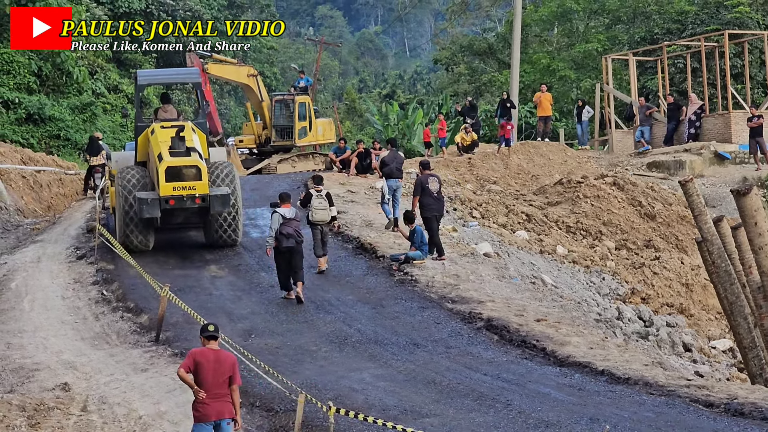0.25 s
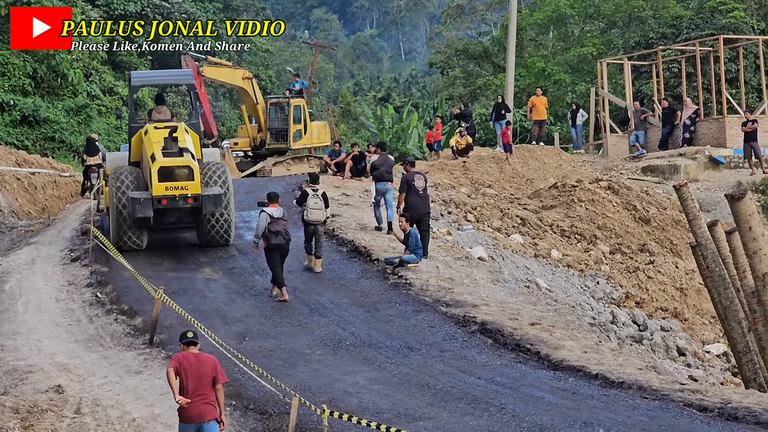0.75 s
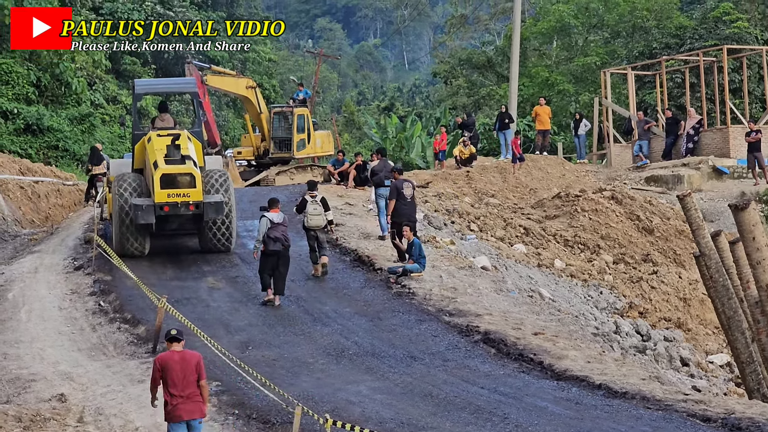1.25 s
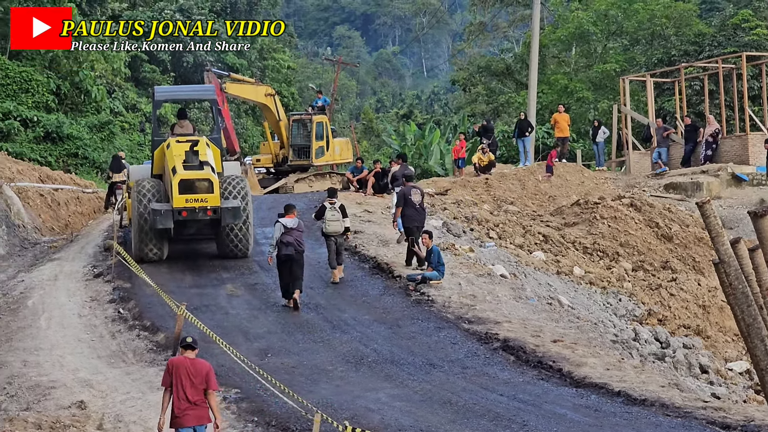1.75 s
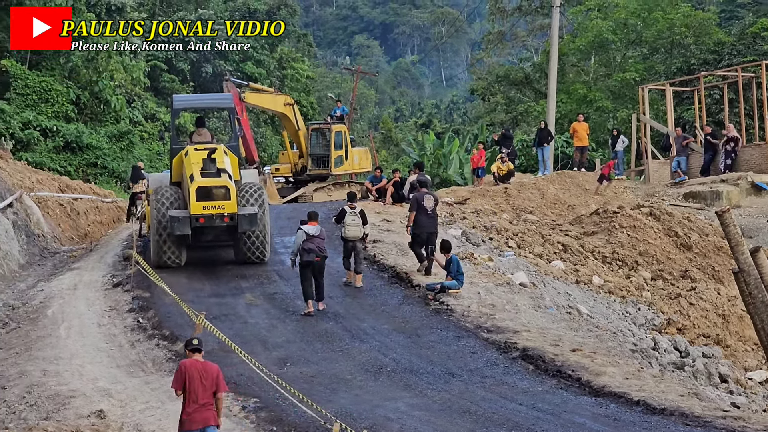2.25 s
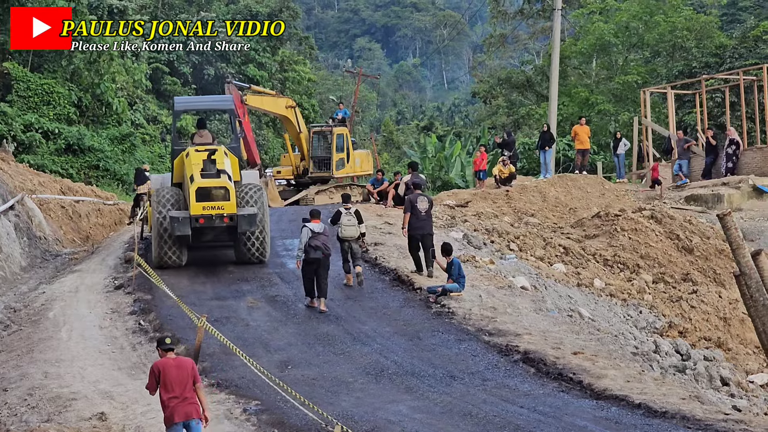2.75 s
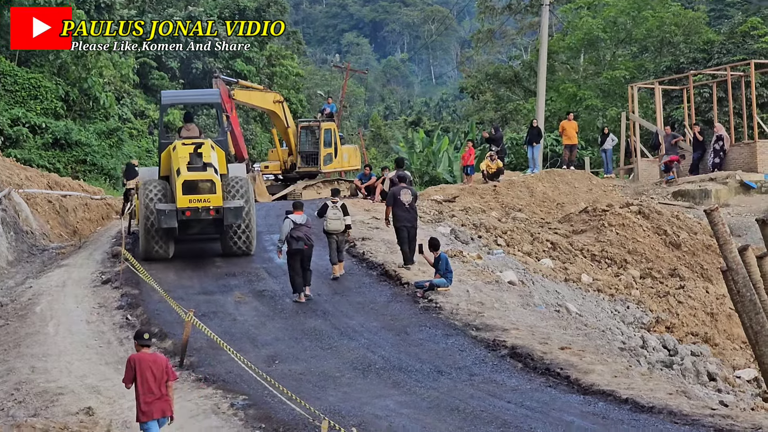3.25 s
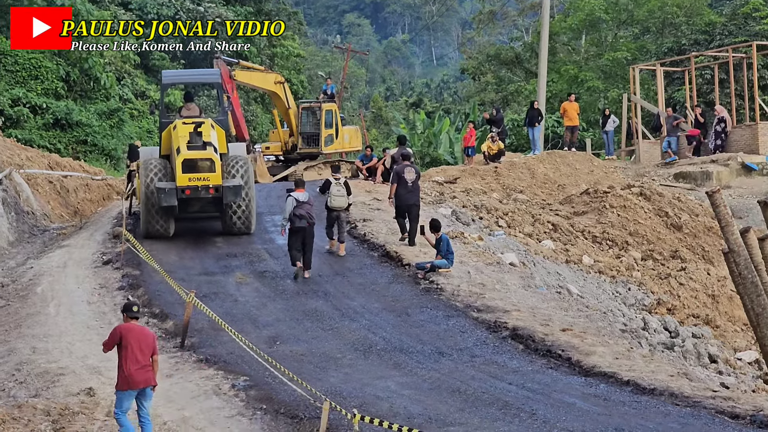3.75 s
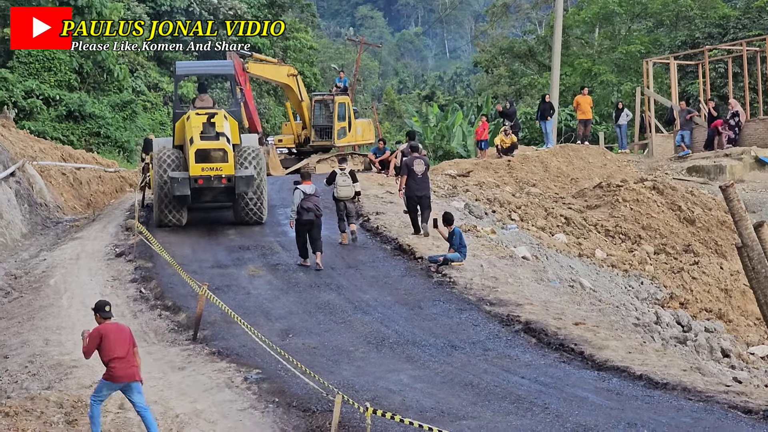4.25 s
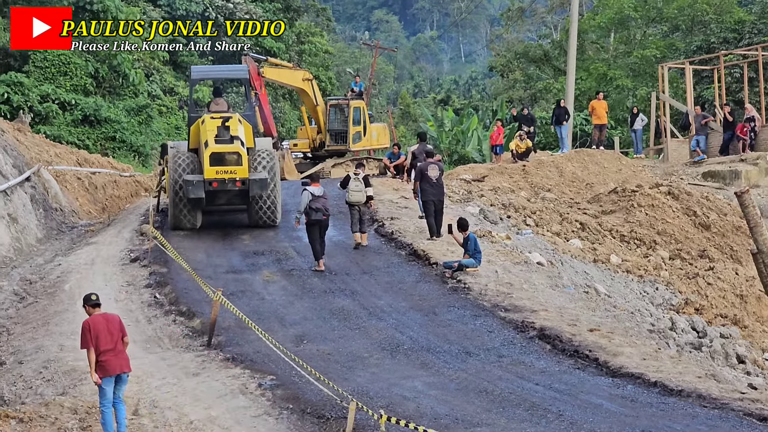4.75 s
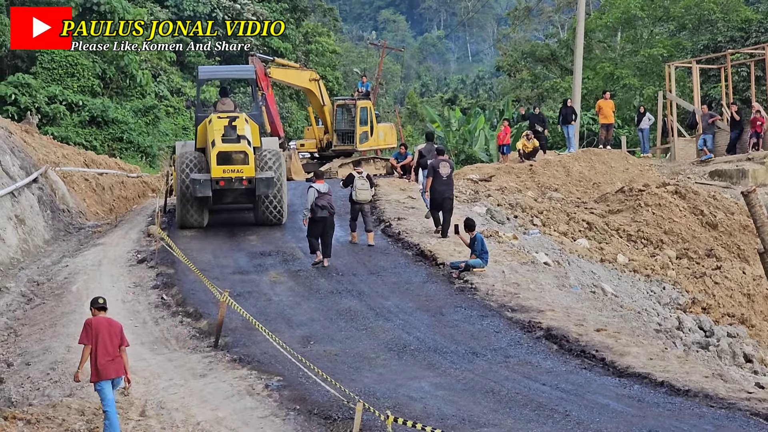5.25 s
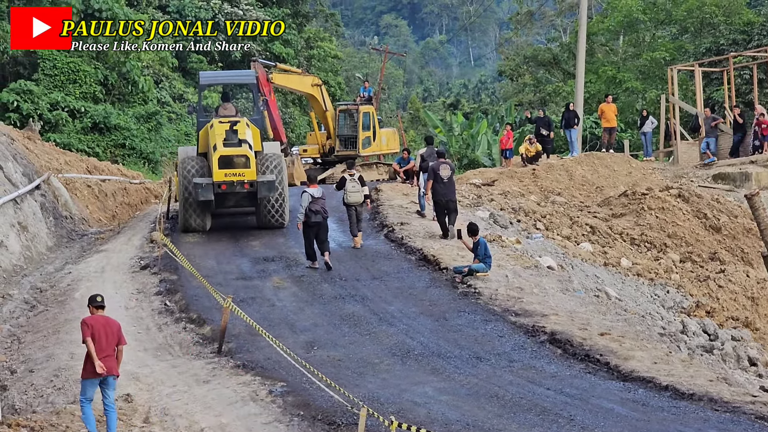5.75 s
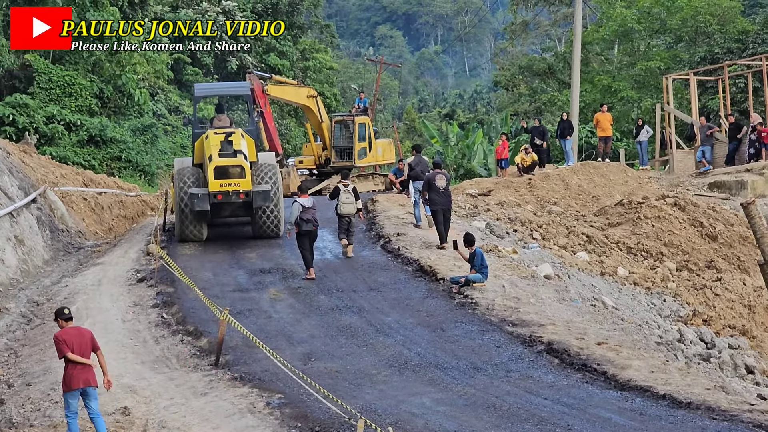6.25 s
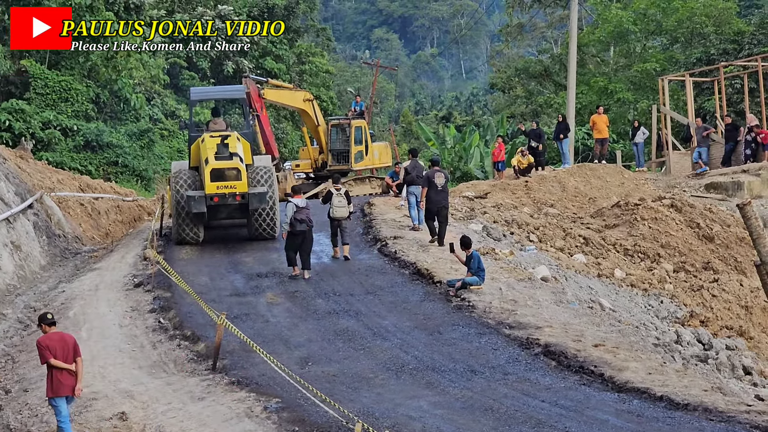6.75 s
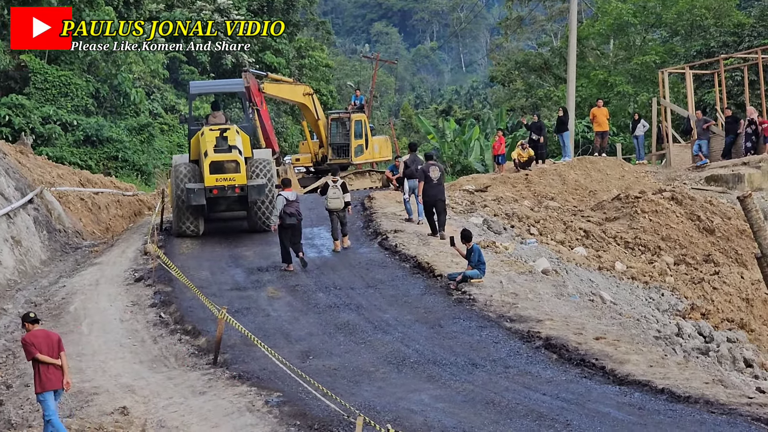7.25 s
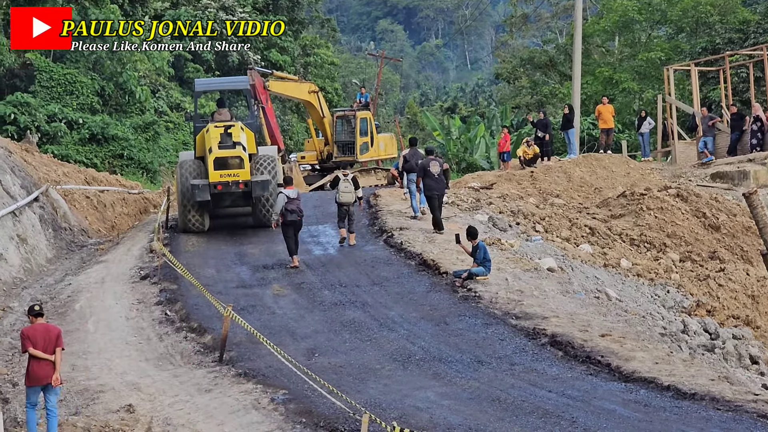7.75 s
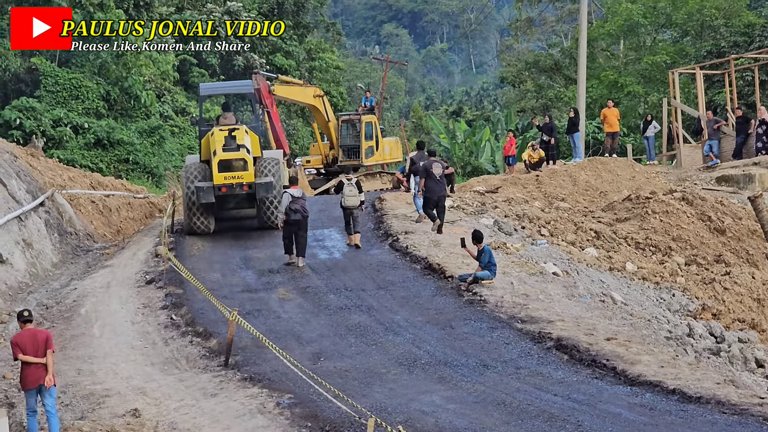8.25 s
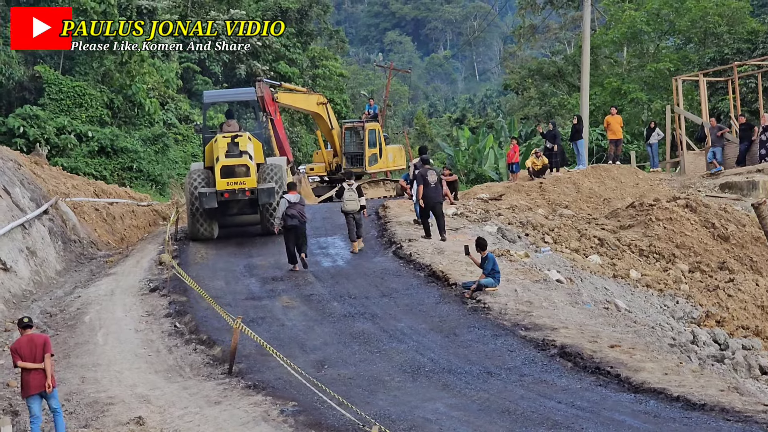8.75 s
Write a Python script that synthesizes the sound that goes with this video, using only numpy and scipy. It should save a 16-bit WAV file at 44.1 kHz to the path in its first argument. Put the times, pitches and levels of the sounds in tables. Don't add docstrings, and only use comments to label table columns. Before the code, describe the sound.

Strong low diesel hum from a working road roller, layered with whine and hissy mechanical clatter, with a few metallic knocks and faint chirps.

```python
import sys
import numpy as np
from scipy import signal
from scipy.fft import rfft, irfft
from scipy.io import wavfile
from scipy.ndimage import uniform_filter1d

SR = 44100
rng = np.random.default_rng(int(sys.argv[2]) if len(sys.argv) > 2 else 0)


def amp(db):
    return 10 ** (np.asarray(db, float) / 20)


def write(x):
    x = np.atleast_2d(x).T
    wavfile.write(sys.argv[1], SR, np.round(np.clip(x, -1, 1) * 32767).astype(np.int16))


N = 396900


def in_time(rows):
    s, *columns = np.transpose(rows)
    return [np.interp(np.arange(N) / SR, s, c) for c in columns]


def at_hz(rows, hz):
    f, *columns = np.transpose(rows)
    return [np.interp(np.log(hz), np.log(f), c) for c in columns]


def drift(rate_hz):
    pole = np.exp(-80 * np.pi * rate_hz / SR)
    white = rng.standard_normal(N // 40 + 2002)
    slow = signal.lfilter([1], [1, -2 * pole, pole * pole], white)[2000:]
    return np.interp(np.arange(N) / 40, np.arange(len(slow)), slow / slow.std())


def bump(at_s, width_s):
    return np.exp(-((np.arange(N, dtype=np.float32) / SR - at_s) / width_s) ** 2)


def from_db(db):
    return np.exp(np.float32(np.log(10) / 20) * np.asarray(db, np.float32))


def pan(x, left_db):
    return x * from_db(np.array([[.5], [-.5]]) * left_db)


def add_at(out, s, x):
    out[:, round(s * SR):][:, :x.shape[1]] += x


# t/s, firing f/Hz, exhaust hum level/dB
GOVERNOR = [(0, 60.48, -8.5), (.3, 60.55, -8.5), (.75, 60.87, -7.9), (1.5, 61.62, -8.4), (1.8, 61.3, -8.2),
            (2.2, 61.06, -7.2), (2.75, 61.27, -6.9), (3.4, 60.96, -7.4), (4.15, 60.5, -8.1),
            (4.75, 61.06, -8.4), (5.1, 61.13, -8.1), (5.5, 61.02, -8.3), (5.95, 61.4, -7.8),
            (6.55, 61.0, -7.1), (7.45, 61.25, -7.0), (8.0, 61.1, -7.4), (8.5, 61.29, -7.2),
            (9, 61.13, -8.1)]


def engine_cycle():
    firing_hz, hum_db = in_time(GOVERNOR)
    start_rad = 1.32
    return start_rad + 2 * np.pi * np.cumsum(firing_hz / 4) / SR, hum_db


# t/s, turn/0-1
PORT_TURN = [
    (0, 0.1),
    (3.4, 0.15),
    (3.8, 0.5),
    (4.2, 0.92),
    (4.6, 0.9),
    (9, 0.97),
]


def turn_at(s):
    return np.interp(s, *np.transpose(PORT_TURN))


# f/Hz, left level/dB per Hz, right level/dB per Hz, left lead/rad, likeness/0-1
AWAY_POSE = [(25, -53.5, -55.5, -.2, 0.99), (112, -45.5, -47, -.05, 1.0), (167, -52.5, -54.3, -.05, 1),
             (404, -65, -63.5, 0.1, 0.86), (556, -61.5, -68.5, 0.7, 0.7), (803, -59.5, -57, -0.1, 0.95),
             (920, -64.5, -65.5, 2.02, 0.8), (1880, -72.5, -78.5, 2.2, 0.6), (2360, -76, -80.5, 5.3, 0.4),
             (3300, -80, -77.5, 7.5, 0.6), (4600, -82.5, -76, 10, 0.7), (7200, -94, -93.5, 12.5, 0.6),
             (8900, -103.2, -116.9, 12, 0), (10500, -96.5, -100.5, 17, 0.17)]
ROLLER_POSE = [(24.5, -58, -57, -.2, 0.95), (113, -46, -48, -.1, 0.99), (174, -55, -56.5, -0.1, 0.97),
               (400, -60.5, -61.5, 0.3, 0.9), (570, -56.5, -57.5, 0.2, 0.92), (790, -66.5, -68.5, 1, 0.98),
               (930, -62, -63, 0.36, 0.88), (1900, -70, -71, 1.0, 0.96), (2310, -73.5, -76, 0.7, 0.7),
               (3320, -77.5, -78, 1.6, 0.65), (4340, -84.5, -84, 2.7, 0.9), (6960, -95, -98.5, 4, 0.4),
               (9400, -103.4, -110.8, 10.5, 0.18), (10600, -100.8, -103.7, 20, 0.1)]


def tone(order, cycle, level_db, turn, start_rad):
    hz = order * cycle[-1] / (2 * np.pi * N / SR)
    l0, r0, lead0, _ = at_hz(AWAY_POSE, hz)
    l1, r1, lead1, _ = at_hz(ROLLER_POSE, hz)
    lead = (lead0 + turn * (lead1 - lead0)) * np.array([[.5], [-.5]])
    left_db = l0 - r0 + turn * (l1 - r1 - l0 + r0)
    phase = order * cycle % (2 * np.pi) + start_rad + lead
    return pan(np.sqrt(2) * from_db(level_db) * np.cos(phase.astype(np.float32)), left_db)


# t/s, width/s, exhaust octave lift/dB, fan tone lift/dB
ECHO_IN_STEP = [(.1, 0.42, 1.5, 7.5), (.5, .2, 8.5, -1), (1.1, 0.17, 6.5, 4), (1.5, 0.25, 9, 0),
                (2.55, 0.59, 5, 2.5), (4.1, 0.41, 5.5, 9), (4.5, 0.24, 5, -3), (5.3, 0.18, 2.5, 7),
                (5.7, 0.24, 5.5, -0.5), (6.952, 0.58, 7.5, 7), (8.3, .3, 3.5, -1.5)]


def echo_lifts():
    return sum(bump(s, width_s) * np.array([[octave], [fan]]) for s, width_s, octave, fan in ECHO_IN_STEP)


def exhaust(cycle, turn, hum_db, octave_lift_db):
    hum = np.cos(4 * cycle + [[-.1], [.1]])
    out = pan(np.sqrt(2) * amp(hum_db + .1 * drift(4)), 1.65) * hum
    out += tone(8, cycle, -30 + octave_lift_db + .9 * drift(5), turn, np.pi / 2)
    return out + tone(12, cycle, -34 - 2.5 * turn, turn, -np.pi / 2)


def fan(cycle, turn, lift_db):
    belt_slip = .99618
    t = np.arange(N) / SR
    hidden_db = 2.5 * np.maximum(t - 6.7, 0)
    upper_db = -35 + lift_db - .95 * t - hidden_db
    out = tone(12 * belt_slip, cycle, -36.5 - 2.5 * turn, turn, np.pi / 2 + .14)
    return out + tone(16 * belt_slip, cycle, upper_db + .5 + .4 * drift(4), turn, 0)


# t/s, second harmonic level/dB
PUMP_SECOND = [(0, -28), (.3, -29), (.8, -33.5), (1.5, -34.5), (2.2, -34.5), (2.5, -30), (2.8, -33.5),
               (3.6, -30), (4.0, -26), (4.3, -29.5), (4.8, -28.5), (5.25, -35), (5.5, -29), (5.77, -41.5),
               (6.4, -29.5), (7.0, -29.5), (7.3, -33.5), (9, -34.5)]


def pump(cycle, turn):
    second_db, = in_time(PUMP_SECOND)
    away_db = -42.5 - .4 * (second_db - second_db.max())
    null_db = -6 * bump(3.7, .3)
    third_db = away_db + turn * (-45.5 - away_db) + null_db
    out = tone(36, cycle, second_db + drift(5.9), turn, .68 * drift(1.6))
    return out + tone(54, cycle, third_db + 1.9 * drift(6), turn, .16 * drift(2.7))


# order/cycle, away level/dB, facing level/dB
WEAK_ORDERS = [(2, -45, -44.5), (2.91, -40.5, -34.5), (6, -48.5, -41), (7, -39.5, -42.5), (9, -41, -40),
               (10.27, -40.5, -37), (15, -44, -48.5), (16.75, -50.5, -48), (17.96, -50.5, -49.5),
               (20.11, -45, -48), (21, -51, -53.5), (22.72, -54, -54), (32, -63.5, -41), (34, -48, -41),
               (38.02, -48.5, -42.5), (40.4, -44, -52.5), (44, -48.5, -47)]
# harmonic, away level/dB, facing level/dB
PUMP_UPPER = [
    (5, -56, -57),
    (6, -55, -60),
    (7, -50.5, -49),
    (9, -66.5, -62),
]


def weak_orders(cycle, turn):
    out = np.zeros((2, N))
    upper = [(18 * k, away_db, facing_db) for k, away_db, facing_db in PUMP_UPPER]
    for order, away_db, facing_db in list(WEAK_ORDERS) + upper:
        level_db = away_db + turn * (facing_db - away_db) + 1.9 * drift(2.8)
        start_rad = rng.uniform(0, 2 * np.pi) + .45 * drift(1.9)
        out += tone(round(order), cycle, level_db, turn, start_rad)
    return out


CYLINDER_CLATTER = [
    -3.5,
    2,
    -5.5,
    -4,
]


def clatter(cycle, repeat=.41, gate_db=.5):
    turns = cycle / (2 * np.pi)
    pattern = rng.standard_normal(2890)
    looped = pattern[(turns % 1 * len(pattern)).astype(int)]
    strokes = 4 * turns
    stroke = strokes.astype(int)
    strength = amp(np.array(CYLINDER_CLATTER)[stroke % 4] + rng.normal(0, 1.7, 600)[stroke])
    to_next = -strokes % 1
    gate = 1 + (amp(gate_db) - 1) * strength * np.exp(to_next / .56)
    gate = uniform_filter1d(gate, size=90)
    fresh = rng.standard_normal(N) * gate / np.sqrt(np.mean(gate ** 2))
    return np.sqrt(repeat) * looped + np.sqrt(1 - repeat) * fresh, gate


# f/Hz, width/Hz, away lift/dB, facing lift/dB
BODY_PANELS = [(244, 20, 3, 1), (638, 47, 5, 3.5), (1009, 19, -9, 7.5), (1188, 36, 6.5, 3),
               (1387, 120, 5.5, 3), (1968, 130, 6.5, 5.5), (2515, 33, 7.5, -2.5), (2760, 160, 7.5, 1),
               (2993, 70, 6, 4.5), (3920, 50, 5.5, 2), (4500, 420, 2.5, 4.5), (5360, 130, 3, -2),
               (2070, 48, -2, 0), (82, 38, -2, 2), (220, 18, -1.5, -4.5), (154, 32, 5, 5),
               (304, 22, 3.5, 0), (11400, 4100, 1, -1), (14500, 2200, -6, -2.5)]


def at_ports(shared, own, pose, column):
    hz = np.maximum(np.fft.rfftfreq(N, 1 / SR), 1)
    left_db, right_db, lead, alike = at_hz(pose, hz)
    alike = np.clip(alike, 0, 1)
    lift_db = sum(row[column] / (1 + (2 * (hz - row[0]) / row[1]) ** 2) for row in BODY_PANELS)
    common = np.sqrt(alike) * shared * np.exp(.5j * lead * [[1], [-1]])
    mixed = common + np.sqrt(1 - alike) * own
    return mixed * amp(np.array([left_db, right_db]) + lift_db) * np.sqrt(SR / 2)


# centre f/Hz, trim/dB, loss/dB per s as the roller draws off, close-range lift/dB
NOISE_RANGES = [
    (130, -1.5, 0.0, 2.5),
    (700, 1.5, 0.38, 0.5),
    (3500, 1.5, 0.35, 2.5),
    (11000, 4, 0.0, -0.5),
]


def range_levels():
    t = np.arange(N) / SR
    _, trim_db, loss, close_db = np.transpose(NOISE_RANGES)[..., None]
    levels_db = trim_db - loss * t + close_db * np.exp(-t / .2)
    levels_db[0] -= 3 * bump(5.2, .98)
    levels_db[3] -= 4.5 * bump(3.65, .3)
    return levels_db


def engine_noise(cycle, turn, own_db=1.34, shared_db=.5):
    shared, gate = clatter(cycle)
    own = rfft(rng.standard_normal((2, N)) * gate ** .5 / np.mean(gate) ** .5)
    shared = rfft(shared)
    poses = np.array([at_ports(shared, own, AWAY_POSE, column=2),
                      at_ports(shared, own, ROLLER_POSE, column=3)], np.complex64)
    hz, turn = np.fft.rfftfreq(N, 1 / SR), np.clip(turn, 0, 1)
    late = np.interp(np.arange(N) - .3 * SR, np.arange(N), turn)
    swells_db, together = range_levels(), drift(8)
    centres = np.log(np.transpose(NOISE_RANGES)[0])
    below, out = 1 / (1 + (hz / 42) ** 6), 0
    for edge_hz in 90 * 2 ** np.arange(0, 7.6, .5):
        under = 1 / (1 + (hz / edge_hz) ** 12)
        away, facing = irfft(poses * (under - below).astype(np.float32), N)
        below = under
        share = [np.interp(np.log(edge_hz * .84), centres, row) for row in np.eye(4)]
        flicker_db = shared_db * together + own_db * (drift(3) + .8 * drift(30))
        gain = from_db(share @ swells_db + flicker_db)
        turned = (late if edge_hz < 1100 else turn).astype(np.float32)
        out = out + gain * ((1 - turned) ** .7 * away + turned ** .7 * facing)
    return out


# t/s, ring level/dB, rattle level/dB, rattle centre f/Hz, left minus right/dB
METAL_KNOCKS = [
    (6.211, -22.5, -31, 1300, 1),
    (6.220, -17.5, -14, 450, 1),
    (6.224, -44, -32, 1900, 1),
    (7.99, -35, -36, 490, 5),
    (8.15, -46, -40, 2300, 4),
    (8.25, -46, -39, 2300, 4),
    (8.345, -38, -36, 1800, 4),
    (8.36, -44, -36, 2400, 6),
]
# f/Hz, level/dB, t60/s
SHEET_MODES = [(345, 0, .16), (440, -1, .12), (500, -2, .07), (620, -2, .07), (1019, 5, .19),
               (1211, -5, .12), (1365, 0, .22), (1561, -3, .15), (1764, -2, .18), (1990, -1, .08)]


def knocks():
    out, t = np.zeros((2, N)), np.arange(SR // 4) / SR
    lucks = rng.normal(0, .75, (len(METAL_KNOCKS), len(SHEET_MODES)))
    for (s, ring_db, rattle_db, rattle_hz, left_db), luck in zip(METAL_KNOCKS, lucks):
        ring = 0
        for (hz, mode_db, t60_s), d in zip(SHEET_MODES, luck):
            far_db = 10 * abs(np.log2(hz / rattle_hz))
            ring = ring + amp(mode_db + d - far_db - 60 * t / t60_s) * np.sin(2 * np.pi * hz * t + d)
        edges_hz = [rattle_hz / 1.45, rattle_hz * 1.45]
        band = signal.butter(4, edges_hz, "band", fs=SR, output="sos")
        rattle = amp(rattle_db + 8 - 60 * t / .25) * signal.sosfilt(band, rng.standard_normal(len(t)))
        attack = np.minimum(t / .0036, 1)
        add_at(out, s, pan((amp(ring_db) * ring + rattle) * attack, left_db))
    return out


# t/s, peak level/dB, left minus right/dB
DRY_TICKS = [
    (3.6692, -41.5, 4),
    (4.9205, -45.5, -5),
    (5.4648, -42, 2.5),
]


def ticks():
    out, t = np.zeros((2, N)), np.arange(SR // 50) / SR
    for s, peak_db, left_db in DRY_TICKS:
        burst = rng.standard_normal(len(t))
        add_at(out, s, pan(amp(peak_db - 2 - 60 * t / .013) * burst, left_db))
    return signal.sosfilt(signal.butter(2, 1500, "high", fs=SR, output="sos"), out)


# t/s, length/s, start f/Hz, glide/Hz, level/dB
FAR_CHIRPS = [
    (2.31, .03, 4000, -50, -53),
    (2.37, .04, 4500, -50, -54),
    (4.915, .03, 3250, 80, -54),
    (4.945, .04, 3560, -60, -54),
    (5.02, .05, 3150, -250, -54),
    (5.655, .1, 13700, -400, -70),
    (6.92, .18, 4430, -90, -60),
    (8.135, .07, 2200, 100, -51),
]


def chirps():
    out, flutter = np.zeros((2, N)), amp(3.5 * drift(30) - 1.5)
    for s, length_s, start_hz, glide_hz, level_db in FAR_CHIRPS:
        left_db = -4 * (1 - turn_at(s))
        t = np.arange(round(length_s * SR)) / SR
        glide = np.sin(2 * np.pi * (start_hz * t + glide_hz * t ** 2 / (2 * length_s)))
        swell = np.sin(np.pi * (t / length_s) ** .6) ** .39
        add_at(out, s, pan(amp(level_db + 7) * glide * swell, left_db))
    return out * flutter


def scene():
    cycle, hum_db = engine_cycle()
    turn = turn_at(np.arange(N) / SR)
    octave_lift_db, fan_lift_db = echo_lifts()
    tones = exhaust(cycle, turn, hum_db, octave_lift_db) + fan(cycle, turn, fan_lift_db)
    tones += pump(cycle, turn) + weak_orders(cycle, turn)
    return tones + engine_noise(cycle, turn) + knocks() + ticks() + chirps()


# f/Hz, readiness to drop/spreads of chance
TREBLE_DROPOUTS = [(4500, -3.5), (5300, -1.9), (6000, -1.5), (6800, -1.8), (7600, -2.2), (8300, -0.9),
                   (8800, -0.4), (9600, -0.7), (12000, -0.7), (14000, -0.35), (15300, 0)]


def mute_treble_bands(x):
    hz, s, z = signal.stft(x, SR, nperseg=2048)
    hz = hz[4:1024:8, None]
    near_gap = np.exp(-((hz - 8750) / np.array([[[550]], [[1350]]])) ** 4)
    thickening = np.interp(s, [1.1, 1.7, 3.45, 3.62], [.45, 3, 3, .45])
    ready = at_hz(TREBLE_DROPOUTS, hz)[0] + near_gap * (thickening + [[[0]], [[.9]]])
    ready -= (hz < 7500) * (1 - turn_at(s))
    common, each = rng.standard_normal(ready.shape[1:]), rng.standard_normal(ready.shape)
    chance = uniform_filter1d(common + .5 * each, size=3) * np.sqrt(3 / 1.25)
    for tick_s, *_ in DRY_TICKS:
        chance[..., abs(s - tick_s) < .015] = 9
    kept = np.where((chance < ready) & (hz > 4500), .003, 1)
    z[:, :1024] *= np.repeat(kept, 8, axis=1)
    return signal.istft(z, SR, nperseg=2048)[1][:, :N]


def band_limit(x):
    return signal.sosfilt(signal.butter(12, 15490, fs=SR, output="sos"), x)


def record(dry):
    mix = np.clip(mute_treble_bands(dry), -.997, .997)
    return band_limit(mix)


dry = scene()
out = record(dry)
write(out)
```